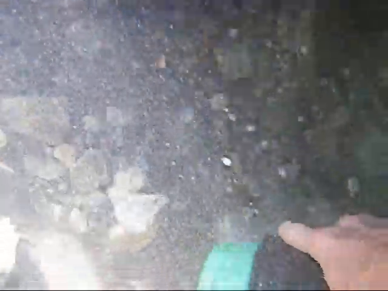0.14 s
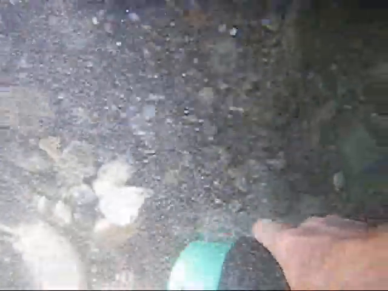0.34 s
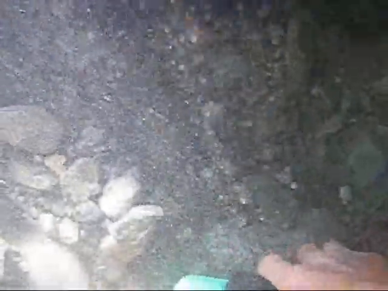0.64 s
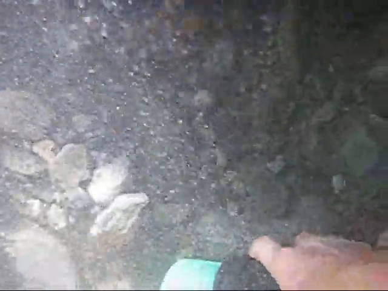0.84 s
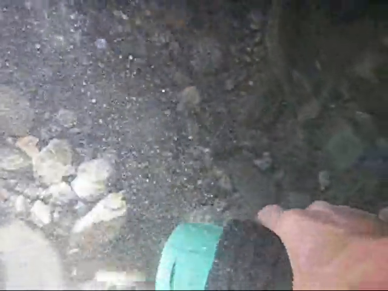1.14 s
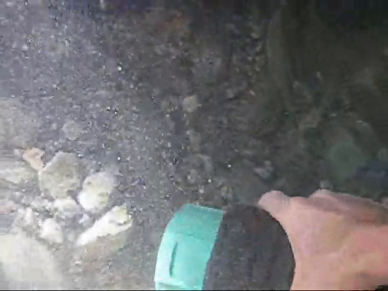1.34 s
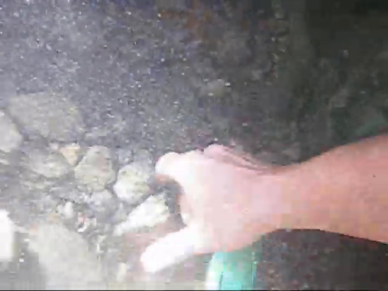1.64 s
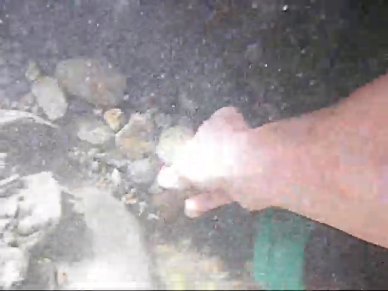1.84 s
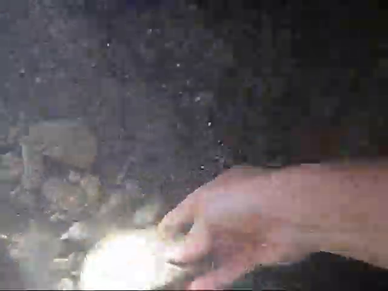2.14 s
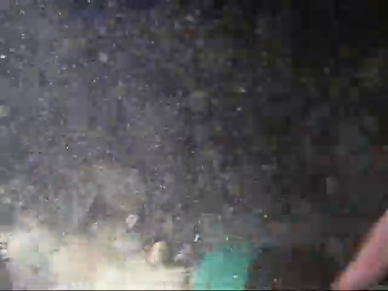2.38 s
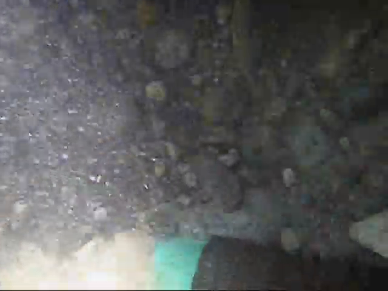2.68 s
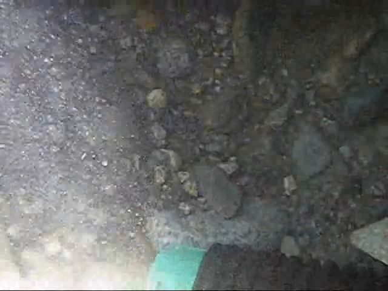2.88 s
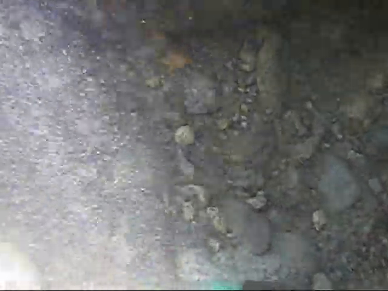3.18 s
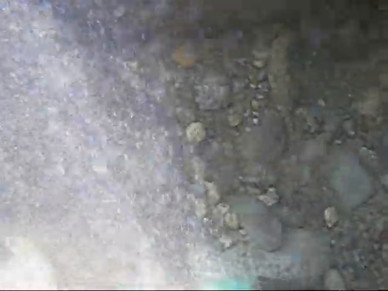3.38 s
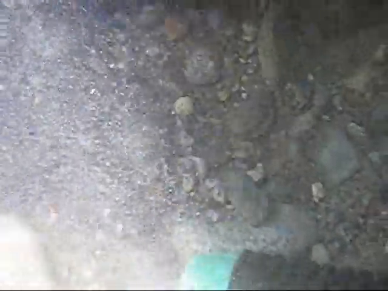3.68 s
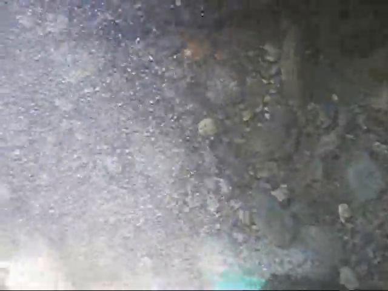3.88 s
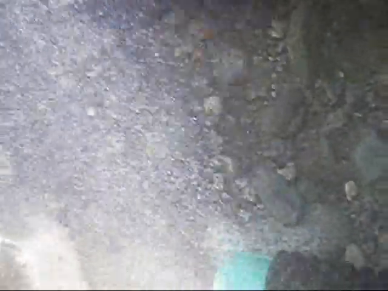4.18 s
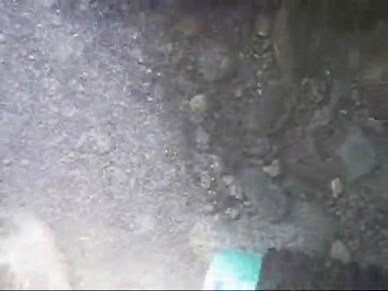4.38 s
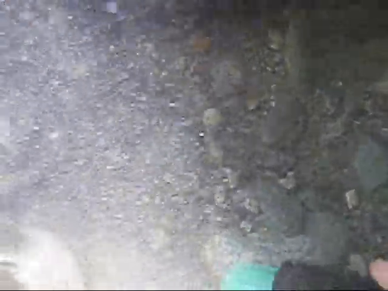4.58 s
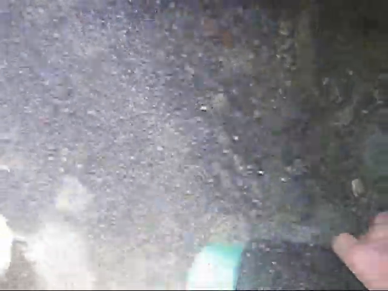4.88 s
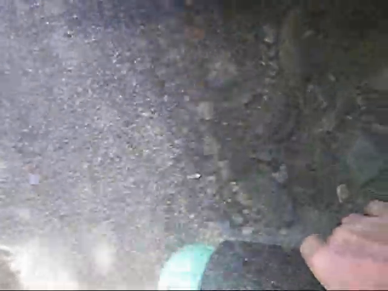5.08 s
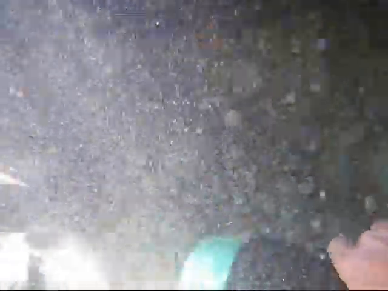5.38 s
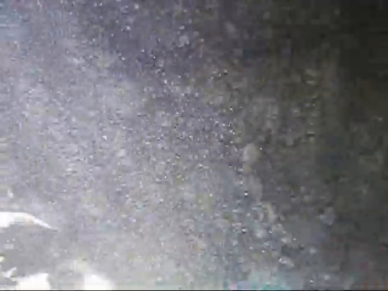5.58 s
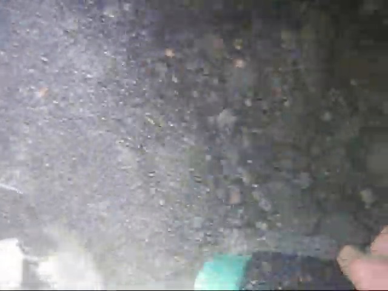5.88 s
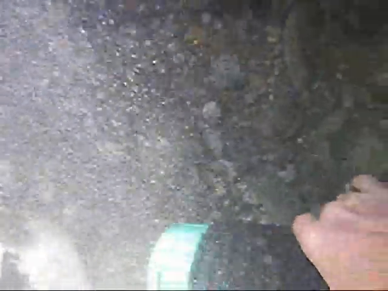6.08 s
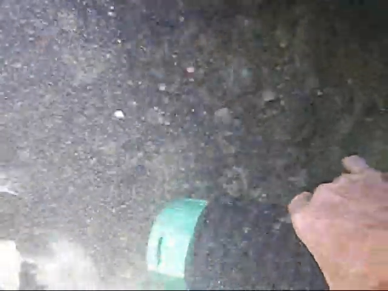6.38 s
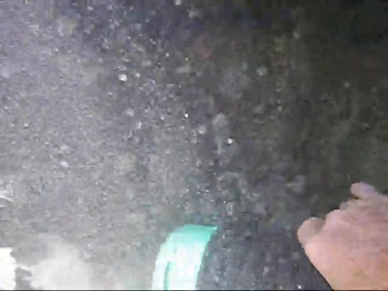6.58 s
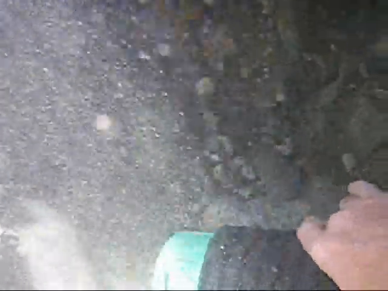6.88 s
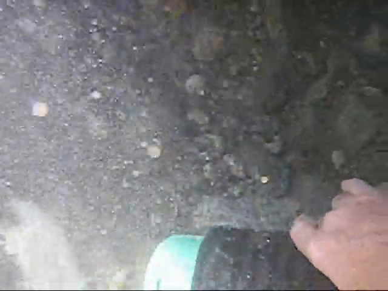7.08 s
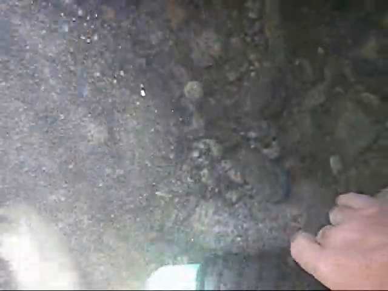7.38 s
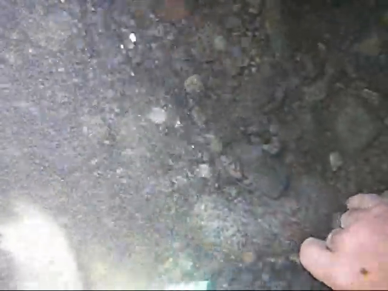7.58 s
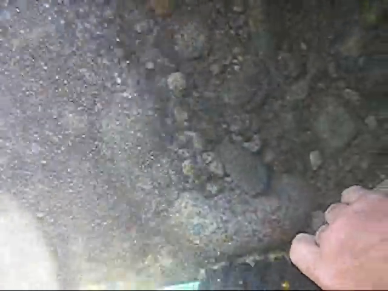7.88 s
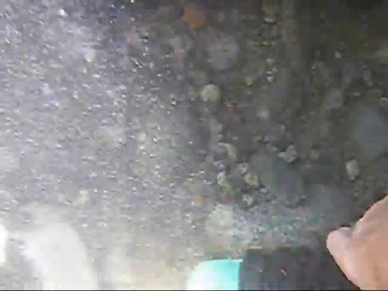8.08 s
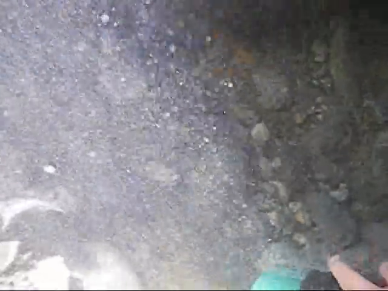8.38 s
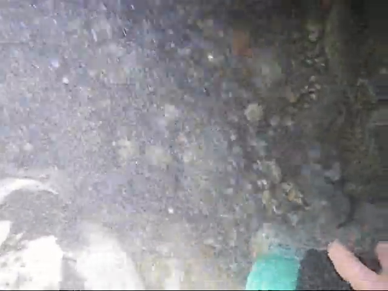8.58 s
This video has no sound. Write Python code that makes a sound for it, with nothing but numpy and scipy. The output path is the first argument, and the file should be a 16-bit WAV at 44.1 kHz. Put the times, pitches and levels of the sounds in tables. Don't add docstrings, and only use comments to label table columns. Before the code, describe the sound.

A sealed camera lies underwater beside a suction hose in a creek, gravel and sand scouring its shell throughout. The steady bed is a boxy, gurgling rumble with gritty hiss above it, flickering and briefly stalling. From 0 to 2.5 s the sand hiss is strongest and stones knock in quick succession, short and hollow, notably around 1.7 to 1.9 s, with bubbles gulping between. From 2.5 to 5 s larger knocks become rare, leaving pebble taps and sharp grit ticks, with a hard tick near 3.9 s and a strong knock near 4.6 s. A run of bubbles then ends in the biggest low gulp at 5 s. Gravel swells to its peak near 6 s, followed by scattered knocks, strong near 6.5 and 7.8 s, and small bright rising bubble chirps until 8.7 s. Loud hits duck the bed; the sound is close, mono, clipped and coarsely digital.

```python
import sys
import numpy as np
from scipy import signal
from scipy.io import wavfile
from scipy.ndimage import uniform_filter1d, map_coordinates

SR = 44100
rng = np.random.default_rng(int(sys.argv[2]) if len(sys.argv) > 2 else 0)


def wav_record(signal):
    frames = np.transpose(np.atleast_2d(signal))
    bounded = np.clip(frames, -1, 1)
    quanta = np.round(bounded * 32767).astype(np.int16)
    wavfile.write(sys.argv[1], SR, quanta)


def undo_db(level):
    steps = np.asarray(level, float) / 20
    return 10 ** steps


N = 385419

# time in seconds, gravel level in dB, sand level in dB, nearness of the intake in dB.
HOSE_LOAD = [(0, -16.5, -22, 6), (.5, -14.5, -26, 0.5), (1, -15.5, -23, 7.5), (1.5, -15.5, -24.5, 3.5),
             (2, -13, -22, 5.5), (2.5, -14, -25, -2), (3, -13.5, -27.5, 0), (3.5, -13, -26.5, -5.5),
             (4, -14, -26.5, -2), (4.5, -12.5, -26, 1), (5, -14, -25, -1.5), (5.5, -13.5, -26, 0),
             (6, -10, -27.5, -6), (6.5, -13, -23.5, 0.5), (7, -13.5, -24, 2.5), (7.5, -13.5, -28, -0.5),
             (8, -14, -27, 1.5), (8.74, -16, -26, 4)]
# time in seconds, depth in
# dB (negative swells).
LEVEL_DIPS = [(.135, 8.5), (.25, 0), (.605, 0), (.905, 1), (1.187, 4), (1.39, 0.5), (1.905, 4.5),
              (2.0, 7.5), (2.38, 4.5), (3.25, 1), (4.0, 0), (4.38, 5), (4.6, 3), (4.635, 6), (6.25, 2),
              (6.85, 1.5), (7.05, 5), (7.38, 3.5), (7.8, -2), (8.12, 0.5)]
# time in seconds, gain in dB.
SAND_SURGES = [(.35, 1), (.47, 3), (1.1, 2.5), (1.25, 1.5), (2.5, 4), (2.75, 2.5), (3.75, 4.5), (4.25, 2.5),
               (5.1, 2.5), (5.28, 1), (6.4, 0.5), (7.45, 4.5), (8.5, -0.5)]
# frequency in Hz, level in dB.
SHELL_LOW = [(18, -65), (30, -108), (59, -25), (135, -32.5), (252, -11.5), (302, -11), (338, -26),
             (355, -28), (535, 1), (620, 2.5), (662, 1), (832, -9.5), (996, -12), (1290, -32), (1500, -41),
             (1950, -61), (3300, -120)]
# frequency in Hz, level in dB.
SHELL_HIGH = [(740, -52), (1250, -15.5), (1340, -17.5), (1580, -7), (1770, -16), (1990, -7), (2190, -12.5),
              (2330, -0.5), (2420, 2), (2790, 2), (3510, -1.5), (4000, -11.5), (5200, -70), (8800, -120)]
# time in seconds, peak in dB.
GRIT_TICKS = [(0.103, -3), (0.195, -14), (0.393, -10), (0.4624, -10), (1.2237, -3), (1.264, -4),
              (1.349, -4), (1.591, -9), (1.6357, -6), (1.6573, -2), (1.6911, -3), (2.1156, -4),
              (2.166, -3.5), (2.262, -9), (2.495, -7), (2.5554, -8), (2.7053, -3.5), (3.175, -5.5),
              (3.714, -2), (3.898, -9), (3.911, 1), (4.0144, -8.5), (5.1, -7), (5.243, -6), (6.0186, -10.5),
              (6.46, -6), (6.896, -10), (7.061, -8), (7.2125, -10), (7.529, -4.5)]
# start in seconds, peak in dB, start pitch in Hz.
LARGE_BUBBLES = [(0.393, -16, 269), (0.958, -9, 260), (1.412, -10.5, 198), (1.564, -26, 242),
                 (1.753, -13, 236), (1.841, -17, 264), (1.874, -6, 248), (2.05, -17, 272),
                 (2.129, -23, 253), (2.266, -12, 250), (2.755, -16, 270), (3.367, -14, 235),
                 (3.799, -18, 262), (4.496, -23, 286), (4.849, -17.5, 174), (4.878, -15, 250),
                 (4.926, -15.5, 270), (4.957, -14, 255), (4.985, -4, 275), (5.005, 1.5, 275),
                 (7.858, -12.5, 198), (8.336, -16, 266)]
# start in seconds, peak in dB, start pitch in Hz.
SMALL_BUBBLES = [(0.229, -10, 874), (0.64, -19, 860), (0.717, -16.5, 980), (0.756, -17, 910),
                 (1.523, -13, 850), (1.792, -12, 1040), (2.138, -23, 835), (2.427, -10.5, 880),
                 (2.532, -8.5, 930), (2.761, -10.5, 940), (2.981, -15, 914), (3.03, -17, 930),
                 (3.715, -10, 820), (3.812, -10.5, 940), (4.035, -6, 846), (4.098, -15, 905),
                 (4.594, -9, 810), (4.719, -16, 880), (5.044, -16, 835), (5.507, -14, 960),
                 (5.814, -10, 850), (6.03, -4, 850), (6.502, -6.5, 934), (6.6, -11, 970), (6.733, -11, 815),
                 (7.149, -17, 887), (7.301, -14.5, 1000), (7.643, -17, 975), (8.203, -17, 880),
                 (8.262, -14.5, 830)]
# time in seconds, peak in dB.
PEBBLES = [(0.197, 2.5), (0.66, -3.5), (0.783, -1.5), (1.435, 1.5), (1.496, -1.5), (2.1, -4), (2.532, -4.5),
           (2.757, -4), (2.868, -1.5), (2.919, 1.5), (3.11, 2), (3.858, -3), (3.953, 1), (4.215, -1),
           (4.237, -4), (4.39, -4), (4.816, -2.5), (5.116, 0.5), (6.029, 1), (6.258, -2), (6.354, 1.5),
           (6.501, -1.5), (6.735, 1), (6.909, 2), (7.148, -2), (7.191, 0), (7.471, 1.5), (7.889, -6),
           (8.349, 1), (8.378, -2.5)]
# time in seconds, peak in dB, ring pitch in Hz.
STONES = [(0.104, 3.5, 685), (0.23, 3.5, 672), (0.387, -10, 616), (0.4, -2, 482), (0.583, 3, 720),
          (0.757, 4, 660), (0.887, 2.5, 590), (1.146, -2.5, 600), (1.52, 1.5, 625), (1.66, 5.5, 614),
          (1.79, 3, 573), (1.875, 4.5, 558), (2.14, 0, 783), (2.224, -1.5, 627), (2.269, 1, 630),
          (2.428, 3, 580), (2.494, -0.5, 590), (3.425, -1.5, 570), (3.718, 1.5, 640), (4.569, 5.5, 680),
          (5.339, -5, 660), (5.367, 2, 580), (5.429, 0, 636), (5.567, 0.5, 650), (6.461, 5, 600),
          (6.961, 1.5, 586), (7.012, 1, 585), (7.226, 2.5, 630), (7.76, 5.5, 620), (8.434, 2.5, 665)]

DIP_S, SURGE_S, SAND_SHARE = 0.024, 0.035, 0.79
DULL_DB, STRAY_DB, STRAY_SPREAD_DB = -23, -15.5, 5
GULP_T60_S, BLIP_T60_S = 0.066, 0.028
PEBBLE_HZ, PEBBLE_SPREAD_HZ = 614, 45
RATTLE_DB, RATTLE_SPREAD_DB = -3.5, 3.5
KNOCK_T60_S, KNOCK_RISE_S, HEFT = 0.039, 0.00071, 3
HOLD_HZ = 8001.46


def evened(x):
    return x / np.sqrt(np.mean(x ** 2) + 1e-20)


def add(mix, start_s, sound):
    part = mix[round(start_s * SR):][:len(sound)]
    part += sound[:len(part)]


def strays(listed_s, db, spread_db, count):
    draw = rng.random((count, 2))
    s = (np.arange(count) + draw[:, 0]) / count * N / SR
    level_db = db + spread_db * (2 * draw[:, 1] - 1)
    free = abs(s[:, None] - np.array(listed_s) - .01).min(axis=1) > .025
    return list(zip(s[free], level_db[free]))


def shell_ring(resonances, size=16384):
    f, db = np.transpose(resonances)
    hz = abs(np.fft.fftfreq(size, 1 / SR))
    gain_db = np.interp(np.log(hz + 1), np.log(f + 1), db, right=-90)
    log_gain = np.log(undo_db(gain_db))
    phase = -signal.hilbert(log_gain).imag
    ring = np.fft.ifft(np.exp(log_gain + 1j * phase)).real[:size // 4]
    return ring / np.linalg.norm(ring)


def chirp(hz, t60_s, rise_oct_per_s, soft_s, size=4000):
    t = np.arange(size) / SR
    turns = np.cumsum(hz * 2 ** (rise_oct_per_s * np.minimum(t, .08))) / SR
    envelope = undo_db(-60 * t / t60_s) * (1 - np.exp(-t / soft_s)) ** 2
    return envelope * np.sin(2 * np.pi * turns)


def grain_taps(per_s, spread_db, wash):
    size = undo_db(spread_db * np.minimum(rng.exponential(1, N), 5)) * rng.choice([-1., 1.], N)
    clicks = evened(size * (rng.random(N) < per_s / SR))
    return evened(clicks + wash * rng.standard_normal(N))


def clumps(memory_s, depth_db):
    drift = signal.lfilter([1], [1, -np.exp(-1 / (memory_s * SR))], rng.standard_normal(N))
    return evened(undo_db(depth_db * evened(uniform_filter1d(drift, size=60))))


def gurgle(per_s, spread_db, count=18):
    out = np.zeros(N)
    for hz in np.linspace(150, 1500, count):
        size = undo_db(spread_db * np.minimum(rng.exponential(1, N // 8 + 1), 5))
        train = np.zeros(N)
        train[::8] = size * (rng.random(len(size)) < 8 * per_s / count / SR)
        bubble = chirp(hz, 22 / hz, 10.6, 0.001, size=3000)
        out += signal.oaconvolve(train, bubble / np.linalg.norm(bubble))[:N]
    return evened(out)


def lift(x, edge_hz, db):
    under = signal.sosfiltfilt(signal.butter(2, edge_hz, fs=SR, output="sos"), x)
    return x + (undo_db(db) - 1) * under


def bumps_db(rows, width_s):
    t = np.arange(N) / SR
    return sum(db * np.exp(-((t - s) / width_s) ** 2) for s, db in rows)


def hose_flow():
    s, gravel_db, sand_db, near_db = np.transpose(HOSE_LOAD)
    t = np.arange(N) / SR
    dip_db = bumps_db(LEVEL_DIPS, DIP_S)
    surge_db = bumps_db(SAND_SURGES, SURGE_S)
    thuds = grain_taps(900, 4.15, 0.89) * clumps(0.0061, 0.5)
    drive = thuds + undo_db(-11) * gurgle(900, 2.0)
    gravel = evened(signal.oaconvolve(drive, shell_ring(SHELL_LOW))[:N])
    gravel = lift(gravel, 520, np.interp(t, s, near_db))
    grains = grain_taps(2500, 1.6, 0.96) * clumps(0.0012, 2.8) * clumps(0.0072, 1.63)
    sand = signal.oaconvolve(grains, shell_ring(SHELL_HIGH))[:N]
    gravel_gain = undo_db(np.interp(t, s, gravel_db) - dip_db)
    sand_gain = undo_db(np.interp(t, s, sand_db) + surge_db - SAND_SHARE * dip_db)
    return gravel_gain * gravel + sand_gain * sand


def grit_ticks():
    out = np.zeros(N)
    t = np.arange(600) / SR
    ring = shell_ring(SHELL_HIGH)
    extra = strays([row[0] for row in GRIT_TICKS], STRAY_DB, STRAY_SPREAD_DB, count=45)
    for s, db in GRIT_TICKS + extra:
        burst = rng.standard_normal(len(t)) * undo_db(-60 * t / 0.029)
        snap = signal.oaconvolve(burst, ring)
        add(out, s, undo_db(db - 3.0) * snap / abs(snap).max())
        add(out, s, undo_db(db + DULL_DB) * chirp(rng.uniform(1240, 1700), 0.0047, 0, 0.00033, size=600))
    return out


def bubble_gulps():
    out = np.zeros(N)
    for s, db, hz in LARGE_BUBBLES:
        add(out, s, undo_db(db + 8.0) * chirp(hz, GULP_T60_S, 1.8, 0.0043, size=9000))
    for s, db, hz in SMALL_BUBBLES:
        add(out, s, undo_db(db + 9.5) * chirp(hz, BLIP_T60_S, 7.2, 0.00067))
    return out


def stone_knocks():
    out = np.zeros(N)
    taken_s = [row[0] for row in STONES + PEBBLES + LEVEL_DIPS]
    small = PEBBLES + strays(taken_s, RATTLE_DB, RATTLE_SPREAD_DB, count=90)
    small_hz = PEBBLE_HZ + PEBBLE_SPREAD_HZ * rng.standard_normal(len(small))
    for s, db, hz in STONES + [(*row, hz) for row, hz in zip(small, small_hz)]:
        t60_s = KNOCK_T60_S * (PEBBLE_HZ / hz) ** HEFT
        ring = chirp(hz, t60_s, 0.64, KNOCK_RISE_S, size=2200)
        level_db = db - 0.44 + 0.52 * max(db - 0.6, 0)
        add(out, max(s - .0007, 0), undo_db(level_db) * ring / abs(ring).max())
    return signal.sosfilt(signal.butter(3, [360, 1300], "band", fs=SR, output="sos"), out)


def scene():
    return (hose_flow() + grit_ticks() + bubble_gulps() + stone_knocks())[None]


def gain_control(x):
    peak_db = 10 * np.log10(abs(uniform_filter1d(x ** 2, size=100)) + 1e-12)
    fall_db = np.arange(N) * 204.0 / SR
    over_db = np.maximum(np.maximum.accumulate(peak_db + fall_db) - fall_db + 14.0, 0)
    lag = np.exp(-1 / (0.0014 * SR))
    return x * undo_db(2.5 - 0.65 * signal.lfilter([1 - lag], [1, -lag], over_db))


def sample_and_hold(x):
    step = (np.arange(N) * HOLD_HZ / SR).astype(int)
    samples = map_coordinates(x, [np.arange(step[-1] + 1) * SR / HOLD_HZ], order=3)
    return np.clip(samples, -.97, .97)[step] - .004


def band_limit(x):
    return signal.sosfilt(signal.butter(12, 15720, fs=SR, output="sos"), x)


def record(dry):
    ducked = gain_control(dry[0])
    ducked = signal.sosfilt(signal.butter(2, 105, "high", fs=SR, output="sos"), ducked)
    ducked += undo_db(-44.0) * rng.standard_normal(N)
    held = sample_and_hold(ducked)
    return band_limit(held[None])


dry = scene()
out = record(dry)
wav_record(out)
```